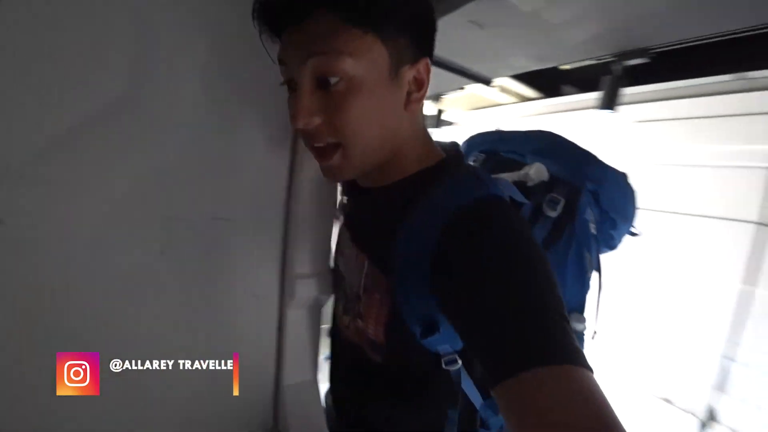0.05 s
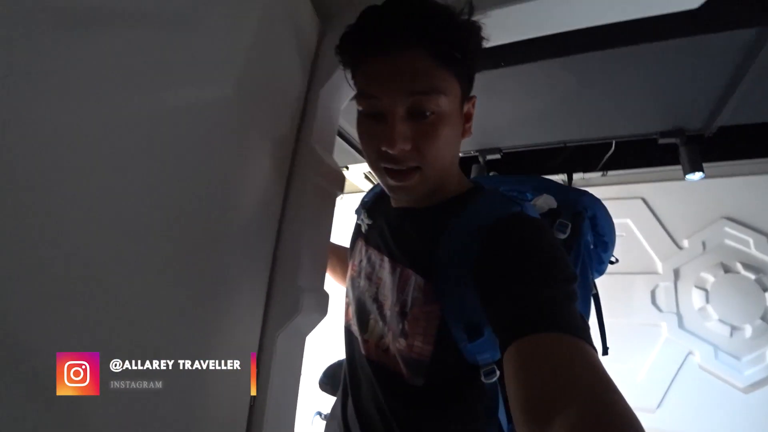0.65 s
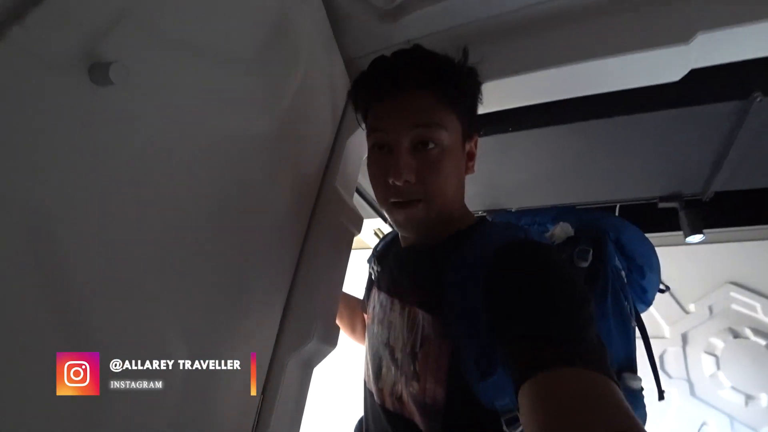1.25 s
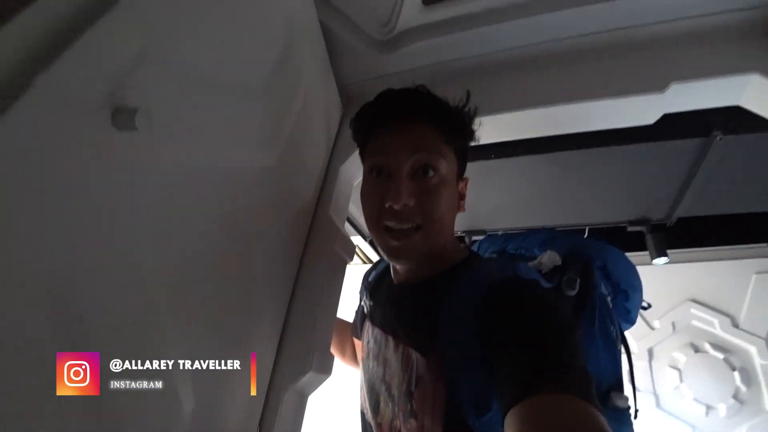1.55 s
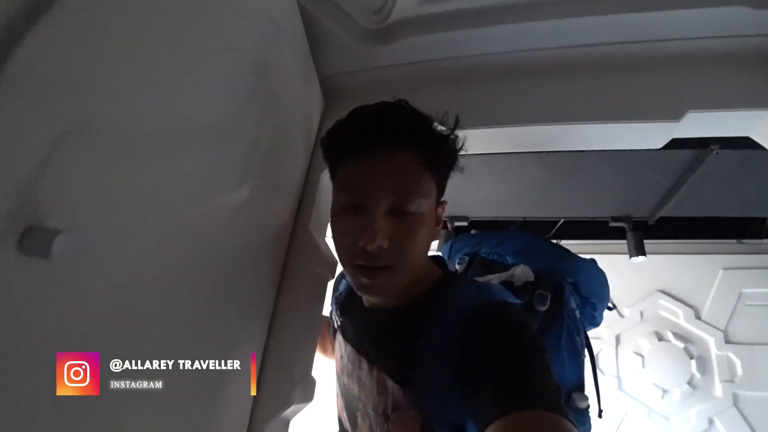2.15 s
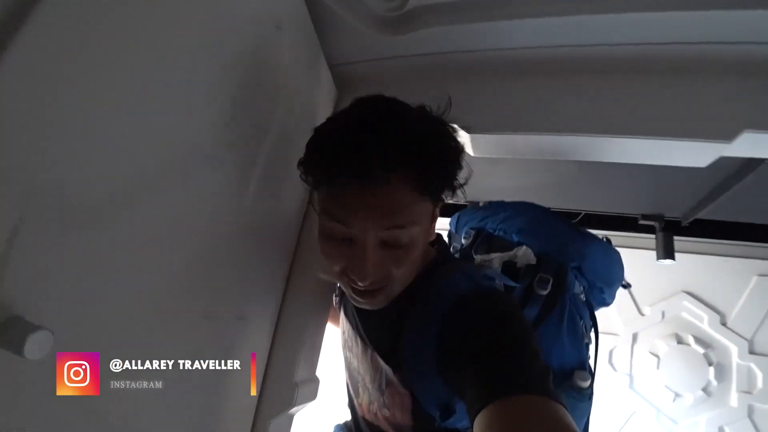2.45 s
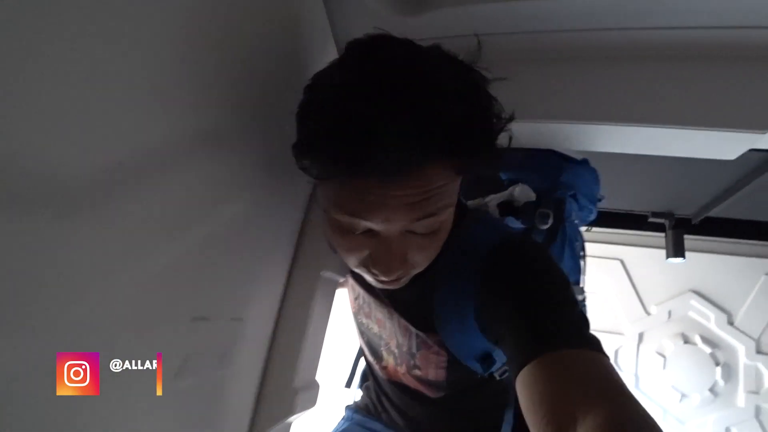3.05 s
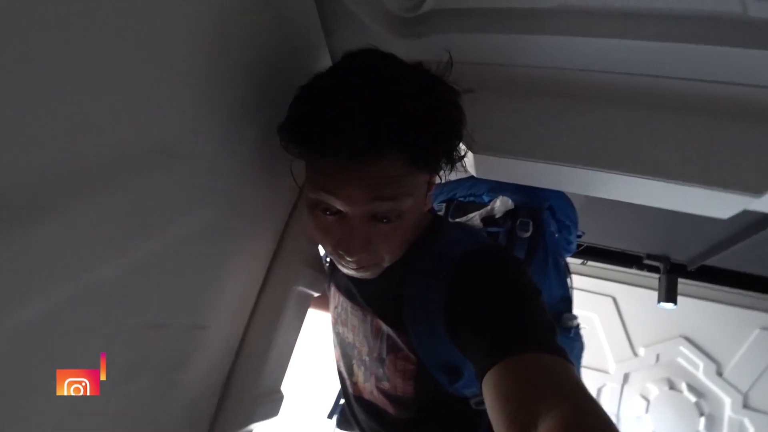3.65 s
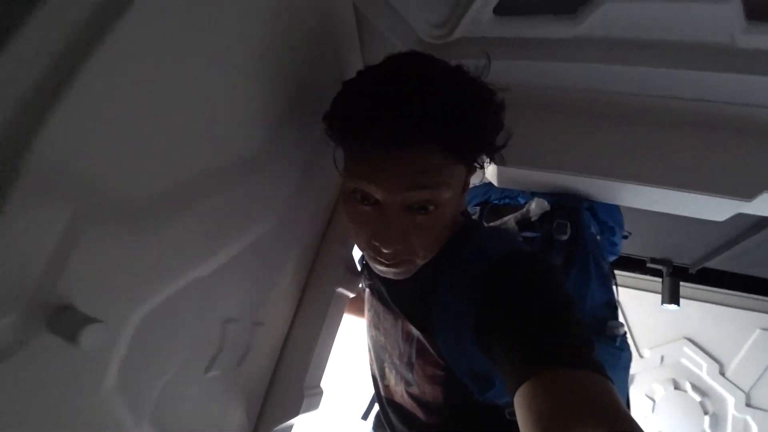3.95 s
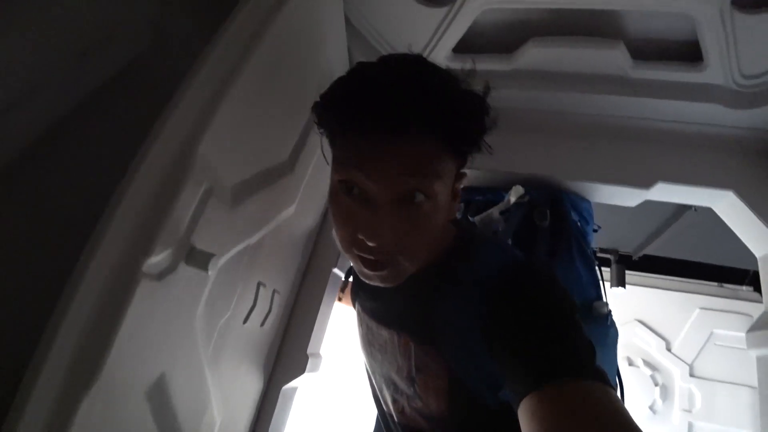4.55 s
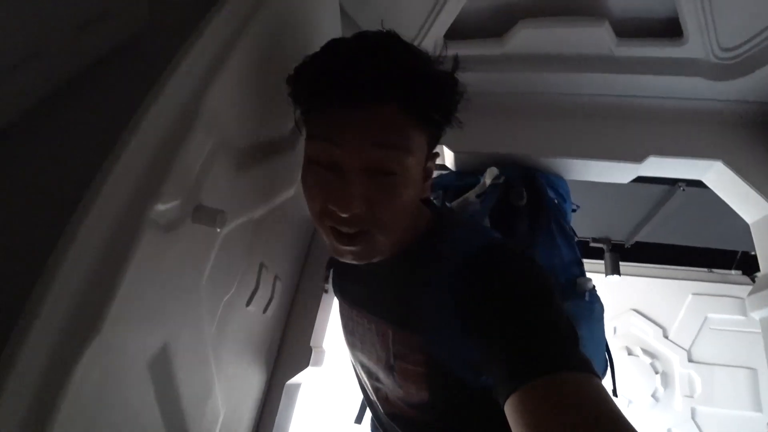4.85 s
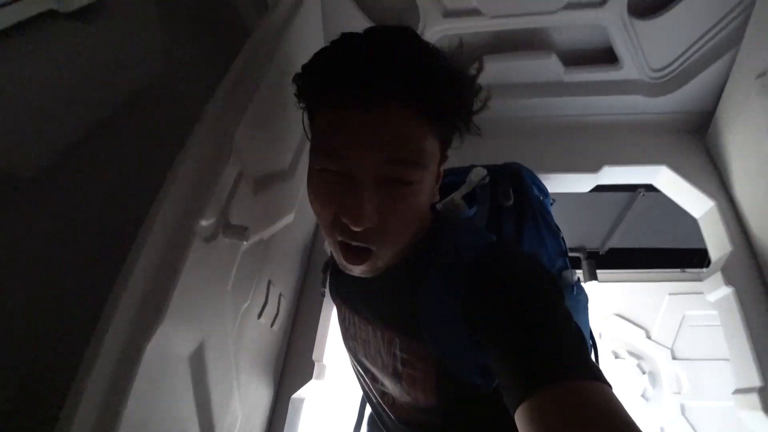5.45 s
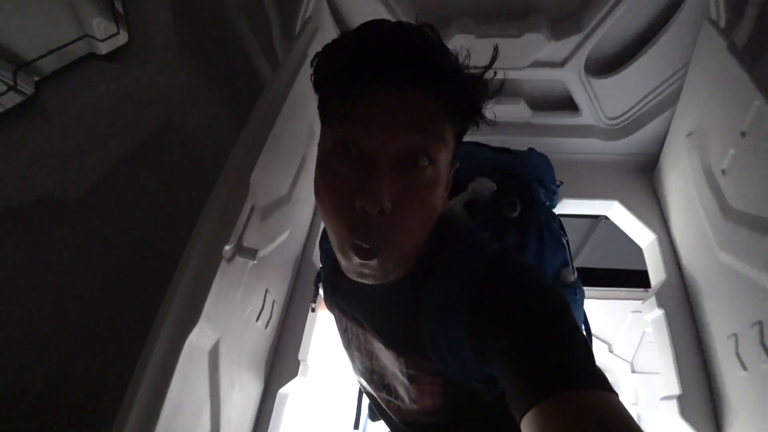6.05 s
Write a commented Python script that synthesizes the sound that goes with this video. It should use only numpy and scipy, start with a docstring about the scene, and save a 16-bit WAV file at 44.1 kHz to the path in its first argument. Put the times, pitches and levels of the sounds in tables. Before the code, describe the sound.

Hollow knocks and dull bumps on plastic panels, with a nylon backpack rubbing and scraping as someone climbs into a small pod.

```python
"""Climbing into a plastic sleeping pod

Someone with a large nylon backpack climbs into a small moulded pod indoors. Impacts excite its damped
modes: buckles and hands knock on hollow panels, feet and knees bump dully on the step. Stick-slip
friction sounds as the pack drags along the door frame in short rubs and one long slide.
Straps tick, zip pulls clink, and ventilation hums behind it all."""
import sys
import numpy as np
from scipy import signal
from scipy.fft import rfft, irfft, next_fast_len
from scipy.io import wavfile

SR = 44100
rng = np.random.default_rng(int(sys.argv[2]) if len(sys.argv) > 2 else 0)


def to_wav(s):
    """Save 16-bit WAV."""
    ch = np.atleast_2d(s).T  # columns
    pcm = np.round(np.clip(ch, -1, 1) * 32767)  # PCM
    wavfile.write(sys.argv[1], SR, pcm.astype(np.int16))


N = 278315

KNOCK_RISE_S, SOFTENING_DB = 0.0008, 21  # the rise time doubles for each such drop in hardness
# resonances of the panelling: f/Hz, gain/dB, T60/s
PANEL_MODES = [(565, 6.5, 0.085), (1020, -2, 0.018), (1370, -23, 0.0091), (1630, 8, 0.17),
               (2210, -1, 0.085), (2726, -4.5, 0.016)]
# blows on the panels, except the row at 0.307 s, a sharp catch within a rub: t/s, level/dB, f/Hz, hardness/dB
# (spectral level at 2800 Hz), T60/s
PANEL_KNOCKS = [(0.108, 5.5, 740, -2.5, 0.26), (0.177, -13.5, 896, 12.5, 0.29), (0.222, 1.5, 1000, -2, 0.1),
                (0.231, 8, 1000, -5, 0.089), (0.273, -1.5, 940, 0.5, 0.081), (0.307, 6.5, 890, -5, 0.2),
                (0.338, 5.5, 900, -8, 0.13), (0.356, 16, 760, -24, 0.43), (0.374, 10.5, 764, -2, 0.058),
                (0.389, 13, 725, -12, 0.15), (2.553, 14, 1320, -7, 0.12), (2.585, 6.5, 1390, -10, 0.17),
                (2.606, 9, 1140, -24, 0.12), (2.638, 8.5, 1080, -10, 0.16), (3.079, 1.5, 1250, -3.5, 0.25),
                (3.337, -2.5, 1010, 3.5, 0.054), (3.407, -8.5, 1390, 8, 0.11), (3.917, 7.5, 710, -7, 0.15),
                (4.034, 12, 920, -32, 0.12), (4.08, 8.5, 676, -2.5, 0.15), (4.177, 14.5, 1540, -3, 0.16),
                (4.184, 15.5, 1580, -1, 0.034), (4.201, 6, 1490, -2, 0.036), (4.2434, 5.5, 740, 4, 0.095),
                (4.529, 17.5, 925, -13, 0.17), (5.0249, 11.5, 1230, -9, 0.056),
                (5.084, 5, 1740, 0.5, 0.034), (5.423, 6.5, 880, -1, 0.21), (5.607, 14, 840, -20, 0.13),
                (5.774, 10.5, 754, -3, 0.11), (5.848, 15.5, 1280, -12, 0.081), (5.869, 9.5, 910, -2, 0.058),
                (6.094, -8.5, 970, -5.5, 0.14)]
def knocks():
    """Impact excitation: the harder the contact, the faster its rise and the stronger its treble."""
    blows, rings = np.zeros((2, N)), np.zeros((2, N))
    for s, db, hz, hardness, t60 in PANEL_KNOCKS:
        bass = -7.5 - 12.5 * np.log2(hz / 800)  # lower-pitched spots sound fuller
        treble = -17.5 + 1.1 * hardness
        spectrum = [(30, bass - 42), (130, bass - 6), (320, bass - 1), (0.48 * hz, bass / 5 - 2),
                    (hz, 4), (1.97 * hz, hardness / 2 - .7), (2800, hardness), (4200, hardness - 1),
                    (6500, treble + 4), (11000, treble - 3), (16000, treble - 13)]
        rise_s = KNOCK_RISE_S * 2 ** (-hardness / SOFTENING_DB)
        blow = contact(spectrum, t60, snap_db=1.5 - 84 * t60, room_db=-19.5, rise_s=rise_s)
        add(blows, s, from_db(db) * blow)
        add(rings, s, from_db(db) * sheet_ring(hz))
    return from_db(-3) * resonate(double_wall(blows), PANEL_MODES) + rings


# modes of the struck plastic sheet: f/Hz, level/dB, T60/s
SHEET_MODES = [(618.4, -49, 0.17), (879.4, -54.5, .2), (1023, -48.5, 0.19), (1422.4, -42.5, 0.11),
               (1770, -46, 0.18), (2878, -39.5, 0.057)]
def sheet_ring(pitch_hz):
    """Free vibration: damped sinusoids, excited less the further they lie from the blow's pitch."""
    t = np.arange(SR // 3) / SR
    out = np.zeros((2, len(t)))
    for hz, db, t60 in SHEET_MODES:
        strength_db = db - 10 * abs(np.log2(hz / pitch_hz))
        phase = rng.uniform(0, 2 * np.pi) + rng.uniform(-.7, .7, (2, 1))
        out += from_db(strength_db - 60 * t / t60) * np.sin(2 * np.pi * hz * t + phase)
    return out * (1 - np.exp(-t / KNOCK_RISE_S))


# reflections inside the double-skinned wall: delay/s, gain/dB
WALL_ECHOES = [(.00073, -24), (.00115, -71), (.00283, -13), (.0042, -22.5), (.007, -21.5)]
def double_wall(x):
    """Comb filtering: very short echoes interfere with the direct sound and make it boxy."""
    out = x.copy()
    for s, db in WALL_ECHOES:
        add(out, s, from_db(db) * x)
    return out


# spectrum of a thud: f/pitch, level/dB
THUD_SPECTRUM = [(.12, -34), (.5, -10), (1, 0), (1.7, -6), (2.6, -16), (8, -36), (30, -58)]
# hollow modes of the pressed spot: f/pitch, gain/dB, T60/s
STEP_MODES = [(1, 2, .19), (1.5, -2, .16), (2.2, -3, .14)]
# feet and knees landing on the step: t/s, level/dB, f/Hz
STEP_BUMPS = [(0.815, -18, 446), (0.985, -11.5, 277), (0.987, -8.5, 589), (0.988, -8.5, 886),
              (1.099, -6.5, 332), (1.26, -7.5, 304), (1.283, -8, 301), (1.332, -11, 257),
              (1.384, -11.5, 257), (1.519, -13, 458), (1.534, -16, 1427), (1.73, -10, 414),
              (1.739, -15, 586), (2.366, -8, 712), (2.392, -8, 231), (3.587, -6, 245), (4.654, -15, 192),
              (5.615, -5.5, 236), (5.789, -2.5, 305), (6.021, -14.5, 303)]
def bumps():
    """Soft impact: a slowly rising force excites the step's low modes and hardly any treble."""
    out = np.zeros((2, N))
    for s, db, hz in STEP_BUMPS:
        spectrum = [(hz * ratio, level_db) for ratio, level_db in THUD_SPECTRUM]
        modes = [(hz * ratio, gain_db, t60) for ratio, gain_db, t60 in STEP_MODES]
        thud = contact(spectrum, t60=.15, snap_db=-10, room_db=-16, rise_s=0.0022)
        add(out, s, from_db(db) * resonate(thud, modes))
    return from_db(12) * out


# spectrum of the scraped wall: f/Hz, level/dB
SCRAPE_SPECTRUM = [(250, -24), (480, -5), (680, 2), (900, -4.5), (1250, 2.5), (1750, -5), (2600, -12.5),
                   (5000, -47.5)]
# resonance of the scraped wall: f/Hz, gain/dB, T60/s
WALL_MODE = [(875, 4, .045)]
# spectrum of the nylon weave: f/Hz, level/dB
SWISH_SPECTRUM = [(1000, -17), (2000, 6.5), (2800, 4), (3900, 8), (5200, 1), (6300, -3), (8500, -8),
                  (16000, -100)]
# spectrum of its fibres: f/Hz, level/dB
HISS_SPECTRUM = [(3500, -9.5), (6400, 0), (7600, -3.5), (9000, -6), (10700, -4.5), (12500, -10),
                 (16000, -16)]
def backpack(scrape, swish, hiss):
    """Sliding friction: the pack drives the wall's resonance while its nylon swishes and hisses."""
    drag = friction(SCRAPE_SPECTRUM, slips_per_s=400, spread_db=2, smooth_db=2.5, judder_db=1.1, t60=.1)
    wall = scrape * unit_rms(resonate(drag, WALL_MODE))
    weave = swish * friction(SWISH_SPECTRUM, slips_per_s=340, spread_db=5,
                             smooth_db=2.5, judder_db=1.5, t60=0.01)
    fibres = hiss * friction(HISS_SPECTRUM, slips_per_s=300, spread_db=5,
                             smooth_db=3, judder_db=1.2, t60=0.018)
    return folding(from_db(-1) * wall + from_db(-0.5) * weave + from_db(3) * fibres)


SWISH_DB, SWISH_PER_BRIGHTNESS = 3, 0.46  # a brighter rub swishes more
# the long slide in: t/s, level/dB, nylon brightness/dB
LONG_SLIDE = [(5.19, -53, -8), (5.32, -41.5, -7), (5.41, -36, -13), (5.442, -33.5, -11.5),
              (5.49, -35.5, -11), (5.555, -30, -10.5), (5.61, -34.5, -3.5), (5.655, -34, -11.5),
              (5.71, -31.5, -11.5), (5.82, -34.5, -10), (5.9, -34.5, -9), (5.94, -36.5, -10),
              (5.982, -36.5, -12), (6.01, -48, -10), (6.07, -56, -23)]
# rubs of pack and clothes: t/s, duration/s, level/dB, nylon brightness/dB, weight on the shell/dB
SHORT_RUBS = [(0.116, 0.32, -41, -32, -16.5), (0.289, 0.065, -36, -34, -9.5), (0.765, 0.049, -54, -6, -14),
              (2.586, 0.14, -43, -17.5, -16), (2.716, 0.11, -44, -9.5, -5), (2.818, 0.37, -53.5, -3, -12),
              (3.151, 0.15, -43, -15.5, -31), (3.355, 0.4, -53, -7, -15), (3.657, 0.21, -44, -8.5, -27),
              (3.848, 0.11, -43.5, -13, -2), (3.945, 0.19, -48, 6, 1.5), (4.13, 0.46, -49, 1.5, -7.5),
              (4.62, 0.26, -54.5, 4, -11), (4.789, 0.31, -51, 2, -6.5)]
def movement():
    """Incoherent sources add in power: slide and rubs give scrape, swish, hiss and weight envelopes."""
    t = np.arange(N) / SR
    s, level_db, bright = np.transpose(LONG_SLIDE)
    slide_offsets_db = [1, SWISH_DB + SWISH_PER_BRIGHTNESS * bright - 3.5, bright + 3, -20.5]
    sliding = (t > s[0]) & (t < s[-1])
    power = from_db([np.interp(t, s, level_db + db) for db in slide_offsets_db]) ** 2 * sliding
    for start, length, db, bright, weight in SHORT_RUBS:
        offsets_db = np.array([0, SWISH_DB + SWISH_PER_BRIGHTNESS * bright, bright, weight])
        power += np.outer(from_db(db + offsets_db), rub_envelope(start, length)) ** 2
    return np.sqrt(power)


def rub_envelope(start, length, grip_s=0.13, sag_db_per_s=5.5, release_db_per_s=127):
    """Exponential decay after a linear rise: a rub grips, eases slightly and lets go."""
    t = np.arange(N) / SR - start
    sag_db = sag_db_per_s * (np.clip(t, 0, length) - length / 2)
    release_db = release_db_per_s * np.maximum(t - length, 0)
    return np.clip(t / grip_s, 0, 1) * from_db(-sag_db - release_db)


def folding(x, depth_db=2.2, rate_hz=6):
    """Amplitude modulation: as the pack folds, each band of its rub swells and fades independently."""
    size = next_fast_len(N)
    spectrum, hz = rfft(x, size), np.fft.rfftfreq(size, 1 / SR)
    centres_hz = np.geomspace(600, 12000, 13)
    band_index = np.interp(np.log(hz + 1), np.log(centres_hz), np.arange(len(centres_hz)))
    out = np.zeros((2, N))
    for k in range(len(centres_hz)):
        triangle = np.maximum(1 - np.abs(band_index - k), 0)
        band = irfft(spectrum * triangle, size)[:, :N]
        out += band * from_db(depth_db * drift(rate_hz))
    return out


# spectrum of taut nylon: f/Hz, level/dB
BRUSH_SPECTRUM = [(4000, -25), (10000, 5), (13500, 0), (16000, -8)]
# one quick stroke: t/s, duration/s, level/dB
BRUSH_STROKE = (4.02, 0.11, -43.5)
def brush():
    """Light friction: taut nylon grazes the frame with a thin, airy crinkle."""
    start, length, db = BRUSH_STROKE
    crinkle = friction(BRUSH_SPECTRUM, slips_per_s=540, spread_db=5, smooth_db=8, judder_db=-2, t60=.008)
    return from_db(db) * rub_envelope(start, length) * crinkle


# spectrum of the loaded shell: f/Hz, level/dB
SHELL_SPECTRUM = [(30, -20), (50, -25), (85, -19), (120, -14.5), (190, -3), (290, 3.5), (450, 4), (650, 3),
                  (1200, 2.5), (6000, -10.5), (16000, -26.5)]
def shell_rumble(weight, settle_db=-55, settle_db_per_s=84, resting_db=-67.5):
    """Forced vibration: moving weight drives the hollow shell, which settles after each bump."""
    t = np.arange(N) / SR
    settling_power = sum((t > s) * from_db(db + settle_db - settle_db_per_s * np.abs(t - s)) ** 2
                         for s, db, _ in STEP_BUMPS)
    load = np.sqrt(weight ** 2 + settling_power + from_db(resting_db) ** 2)
    rumble = friction(SHELL_SPECTRUM, slips_per_s=89, spread_db=-0.5,
                      smooth_db=5.5, judder_db=-1.33, t60=0.029)
    return from_db(11) * load * rumble


# spectrum of a tick: f/pitch, level/dB
TICK_SPECTRUM = [(.06, -64), (.4, -9), (.8, -2), (1, 2), (1.25, -5), (2.5, -16), (5, -31.5), (12, -34)]
# ticks of straps and creaking joints: t/s, level/dB, f/Hz, T60/s
STRAP_TICKS = [(0.355, -18, 6200, .02), (0.368, -14, 7150, 0.027), (0.403, -12.5, 4800, .025),
               (0.442, -20, 3700, 0.018), (2.689, -10.5, 2810, 0.035), (2.729, -12, 1910, .014),
               (2.751, -10, 2280, 0.011), (2.8, -7, 2390, 0.016), (2.827, -16, 1750, 0.015),
               (2.853, -13, 2020, 0.01), (2.908, -12, 2160, 0.02), (2.938, -10.5, 1990, 0.013),
               (2.958, -18, 1900, 0.012), (3.493, -13, 2880, 0.015), (3.983, -8, 3740, 0.018),
               (4.386, -7.5, 5000, 0.026), (4.619, -5, 1460, 0.02), (4.831, -1, 1390, 0.0085),
               (4.862, -3, 1330, 0.007), (4.954, -6, 4800, 0.036), (4.968, -1.5, 1460, 0.0061),
               (4.978, -11, 2000, .012), (4.999, -3, 1920, 0.0067), (5.141, -9, 1670, 0.018),
               (5.206, -11, 2060, 0.011), (5.235, -11, 1800, 0.011), (5.248, -7, 4030, 0.027),
               (5.329, -6.5, 4500, 0.031), (5.39, -13, 7900, 0.011), (5.608, 0, 6270, 0.019)]
def ticks():
    """Heavily damped transients: the shorter a tick's decay, the closer it comes to a single pulse."""
    out = np.zeros((2, N))
    for s, db, hz, t60 in STRAP_TICKS:
        spectrum = [(hz * ratio, level_db) for ratio, level_db in TICK_SPECTRUM]
        tick = contact(spectrum, t60, snap_db=8 - 600 * t60, room_db=-9, rise_s=0.00013)
        add(out, s, from_db(db) * tick)
    return from_db(6) * out


# modes of a small metal part: f/pitch, level/dB, T60/s
METAL_MODES = [(.495, -8, .06), (.62, -11, .04), (.766, -10, .04), (.94, -7, .02), (1, 0, .022),
               (1.012, -11, .15), (1.14, -7, .035), (1.2, -10, .04), (1.62, -14, .06)]
# zip pulls and fittings striking: t/s, level/dB, f/Hz
ZIP_CLINKS = [(0.109, -39, 9700), (0.178, -37, 8680), (0.274, -40, 9600), (1.413, -48, 5200),
              (3.335, -36, 4300), (5.249, -32, 4000)]
def clinks():
    """Inharmonic modes: small metal parts clink, and the least damped mode leaves a thin ring."""
    out, t = np.zeros((2, N)), np.arange(SR // 4) / SR
    for s, db, hz in ZIP_CLINKS:
        for ratio, mode_db, t60 in METAL_MODES:
            phase = rng.uniform(0, 2 * np.pi) + rng.uniform(-2.1, 1, (2, 1))
            envelope = from_db(db + mode_db - 60 * t / t60)
            add(out, s, envelope * np.sin(2 * np.pi * hz * ratio * t + phase))
    return out


# spectrum of the ventilation: f/Hz, level/dB
VENT_SPECTRUM = [(25, -31), (50, -36), (80, -38), (110, -18), (190, -35.5), (300, -40), (420, -30),
                 (700, -19.5), (1300, -21.5), (2000, -29), (3200, -27.5), (5000, -31), (16000, -34.5)]
def ventilation(level_db=-60):
    """Stationary broadband noise: air flows steadily in the room outside."""
    air = stereo(rng.standard_normal((2, N)))
    return from_db(level_db) * unit_rms(colour(air, VENT_SPECTRUM))


def contact(spectrum, t60, snap_db, room_db, rise_s):
    """Impulse response of one touch: a direct snap, the plastic's ring and duller reverberation."""
    plastic = dying_noise(t60)
    reverberation = colour(dying_noise(t60=.33), [(1200, 9), (4000, 9.5), (12000, -29)])
    response = plastic + from_db(room_db) * reverberation
    response *= 1 - np.exp(-np.arange(response.shape[1]) / SR / rise_s)
    snap = from_db(snap_db)
    response[0, 0] += snap
    response[1, 2] += snap * rng.choice([-1, 1])  # the snap arrives from one side or the other
    return colour(stereo(response), spectrum) / np.sqrt(1 + snap ** 2)


def friction(spectrum, slips_per_s, spread_db, smooth_db, judder_db, t60):
    """Stick-slip motion: cloth catches in random snaps that ring briefly over a smooth rub; rms 1."""
    sizes = from_db(spread_db * np.minimum(rng.exponential(1, N), 3.5)) * rng.choice([-1, 1], N)
    slips = sizes * (rng.random(N) < slips_per_s / SR)
    ringing = signal.oaconvolve(slips[None], dying_noise(t60), axes=1)[:, :N]
    grains = unit_rms(ringing + slips * [[1], [0]])  # the bare slips sit in the centre
    smooth = from_db(smooth_db) * rng.standard_normal((2, N))
    rub = (grains + smooth) * from_db(judder_db * drift(rate_hz=5.8))
    return unit_rms(colour(stereo(rub), spectrum))


def dying_noise(t60):
    """Dense modes or echoes merge into exponentially decaying noise; two draws of unit energy."""
    t = np.arange(SR // 3) / SR
    tail = rng.standard_normal((2, len(t))) * from_db(-60 * t / t60)
    return tail / np.sqrt(np.sum(tail ** 2, axis=1, keepdims=True))


def resonate(x, modes):
    """Modal superposition: the sound plus the response of one damped resonator per mode."""
    out = x.copy()
    for hz, db, t60 in modes:
        r = from_db(-60 / (t60 * SR))
        gain = (1 - r * r) / 2
        feedback = [1, -2 * r * np.cos(2 * np.pi * hz / SR), r * r]
        out += from_db(db) * signal.lfilter([gain, 0, -gain], feedback, x + 1e-18)
    return out


# likeness of left and right: f/Hz, correlation
STEREO_COHERENCE = [(60, .997), (125, .988), (250, .965), (600, .93), (1400, .74), (5000, .73),
                    (12000, .63)]
def stereo(pair):
    """Spatial coherence: two unrelated signals become left and right, most alike in the bass."""
    hz, alike = np.transpose(STEREO_COHERENCE)
    mid = colour(pair[:1], np.c_[hz, 10 * np.log10((1 + alike) / 2)])
    side = colour(pair[1:], np.c_[hz, 10 * np.log10((1 - alike) / 2)])
    return np.vstack([mid + side, mid - side])


def colour(x, spectrum, size=4096):
    """Minimum-phase filtering: a causal response through the points (f/Hz, level/dB)."""
    hz, db = np.transpose(spectrum)
    gain_db = np.interp(np.log(np.fft.rfftfreq(size, 1 / SR) + 1), np.log(hz), db)
    cepstrum = irfft(np.log(from_db(gain_db)))
    cepstrum[1:size // 2] *= 2
    cepstrum[size // 2 + 1:] = 0
    impulse_response = irfft(np.exp(rfft(cepstrum)))
    return signal.oaconvolve(x, impulse_response[None], axes=1)[:, :x.shape[1]]


def drift(rate_hz, hop=40):
    """Low-passed noise: a slow random fluctuation of rms 1."""
    r = np.exp(-2 * np.pi * rate_hz * hop / SR)
    noise = rng.standard_normal(N // hop + 2002)
    slow = signal.lfilter([1], [1, -2 * r, r * r], noise)[2000:]
    return np.interp(np.arange(N) / hop, np.arange(len(slow)), unit_rms(slow))


def add(track, s, sound):
    """Superposition: the sound joins the track at time s."""
    at = round(s * SR)
    track[:, at:at + sound.shape[1]] += sound[:, :N - at]


def from_db(db):
    """Amplitude ratio of a level."""
    return 10 ** (np.asarray(db) / 20)


def unit_rms(x):
    """Normalisation to unit mean power."""
    return x / np.sqrt(np.mean(x ** 2) + 1e-20)


# resonances of the pod as a whole: f/Hz, gain/dB, T60/s
POD_MODES = [(122, 2, .25), (285, -4, .18), (360, -7, .12), (453, -7, .14), (634, -5, .15), (790, -9, .14),
             (891, 1, .14), (1020, -11, .1), (1190, -9, .12), (1452, -2, .13), (2433, -4, .11),
             (2868, -4, .1), (3145, -8, .1)]
def scene():
    """Cavity resonance colours blows and rubs; ticks, clinks and ventilation arrive directly."""
    scrape, swish, hiss, weight = movement()
    inside = knocks() + bumps() + backpack(scrape, swish, hiss) + brush() + shell_rumble(weight)
    climbing = resonate(inside, POD_MODES) + ticks() + clinks()
    balance = from_db([[-0.35], [0.35]])  # slightly to the right
    return climbing * balance + ventilation()


def record(dry):
    """Band limiting: the lowest rumble is rolled off and the top is cut steeply."""
    high_pass = signal.butter(3, 52, "high", fs=SR, output="sos")
    low_pass = signal.ellip(12, .1, 80, 15850, fs=SR, output="sos")
    return signal.sosfilt(low_pass, signal.sosfilt(high_pass, dry))


dry = scene()
out = record(dry)
to_wav(out)
```